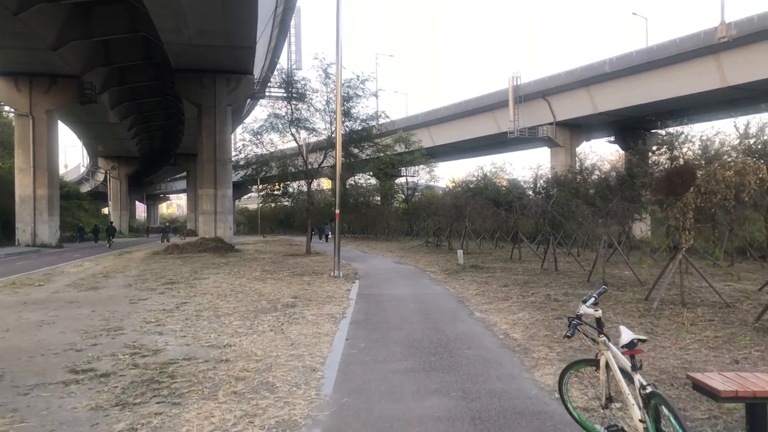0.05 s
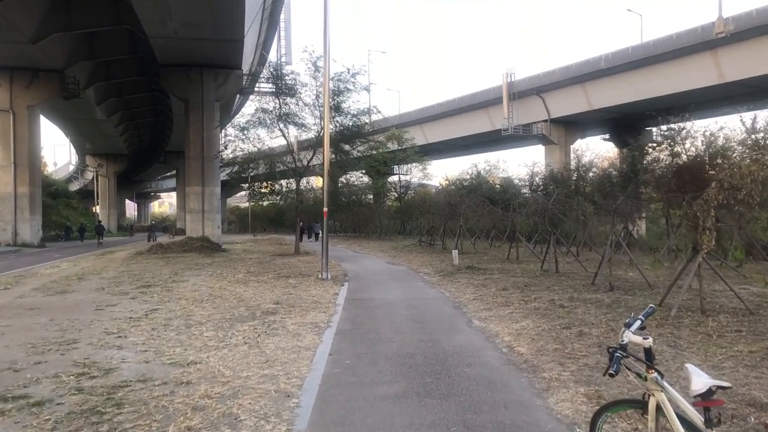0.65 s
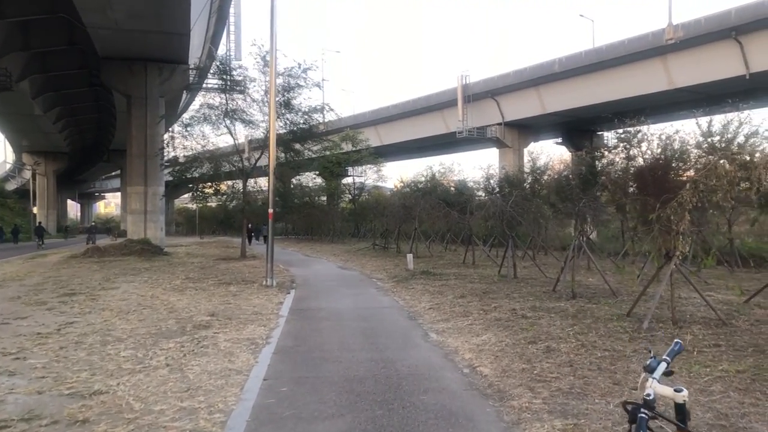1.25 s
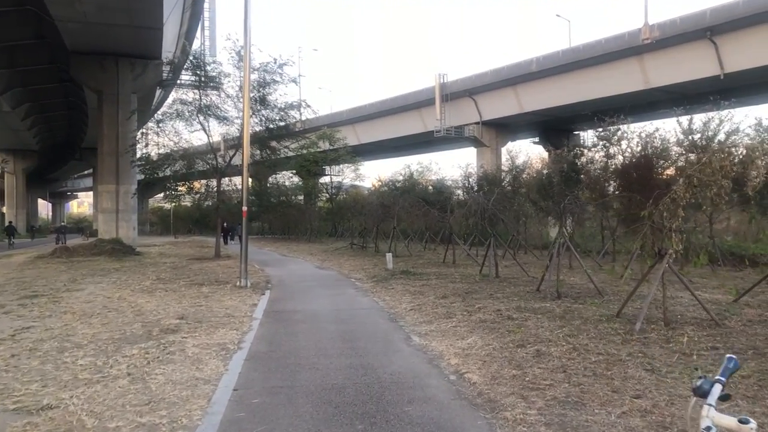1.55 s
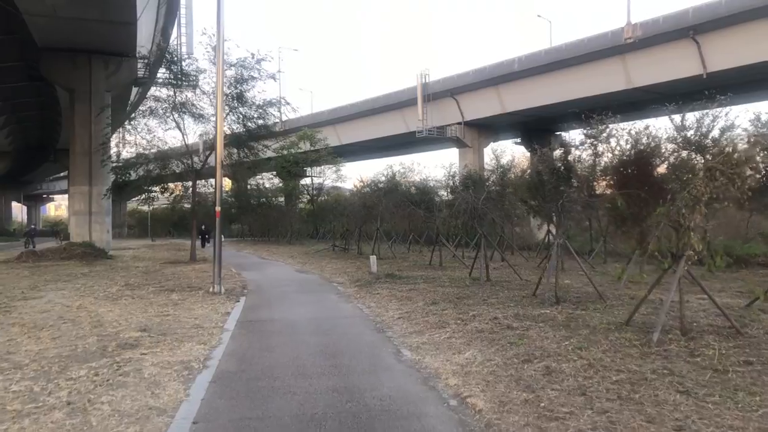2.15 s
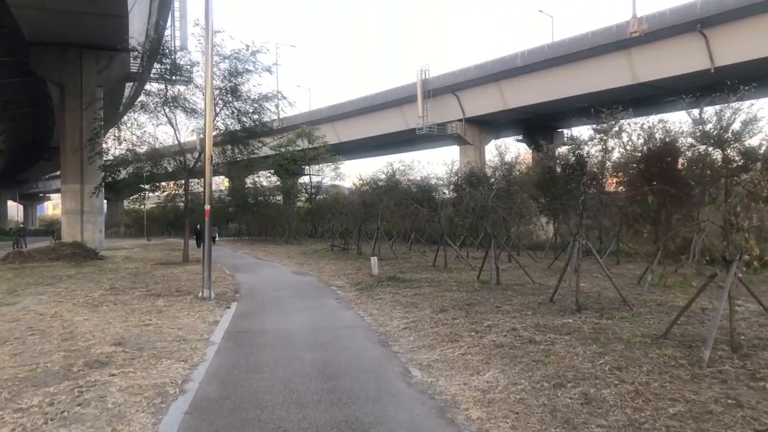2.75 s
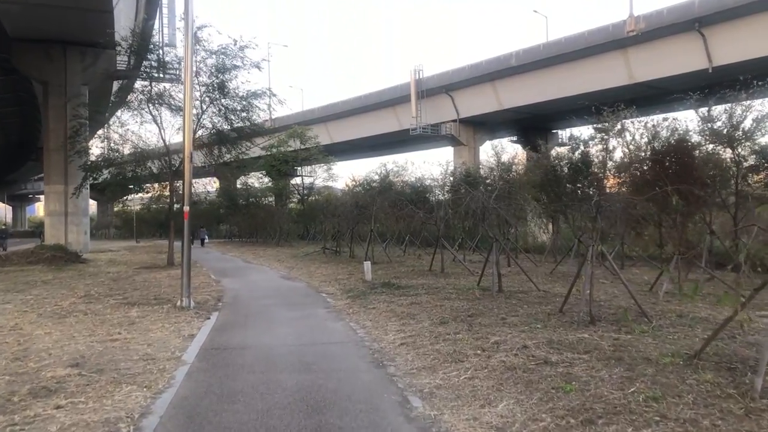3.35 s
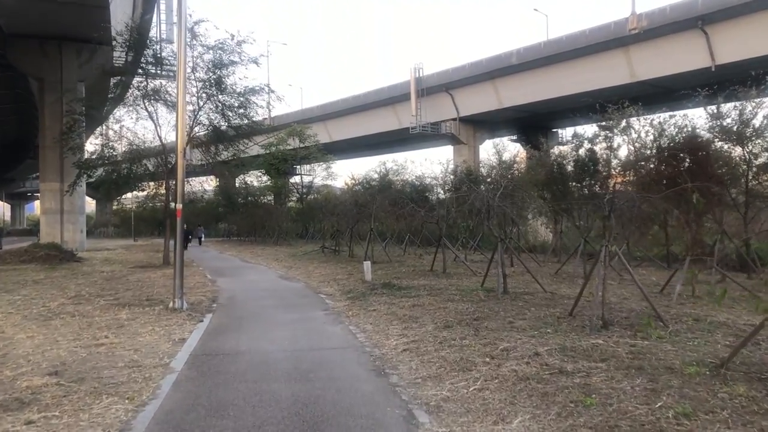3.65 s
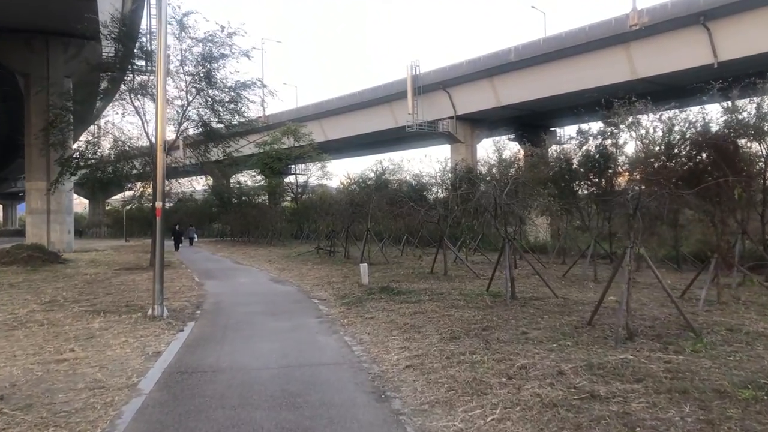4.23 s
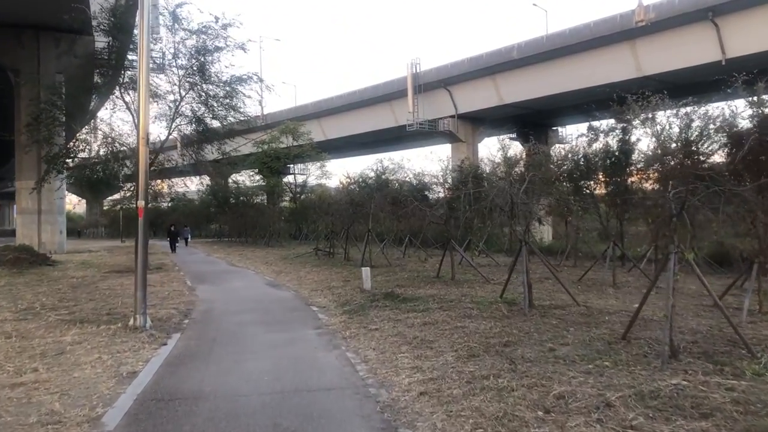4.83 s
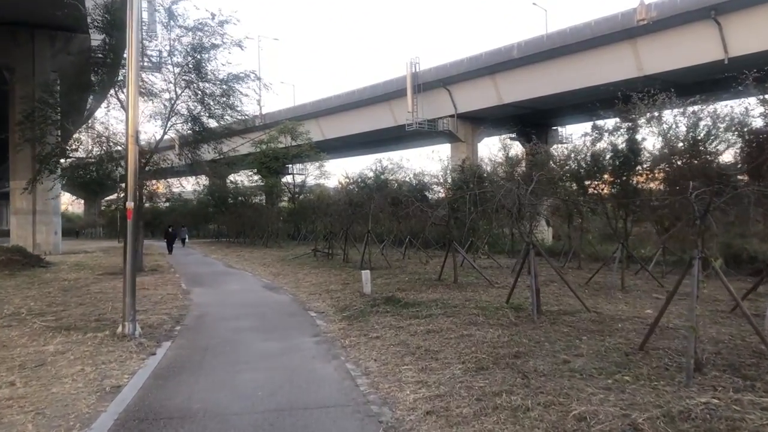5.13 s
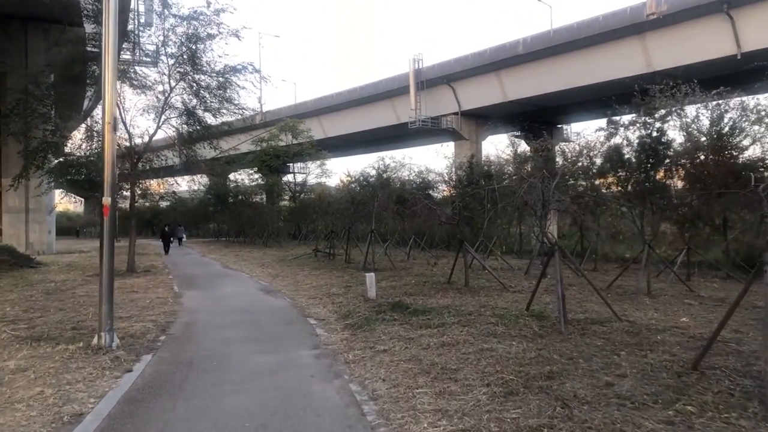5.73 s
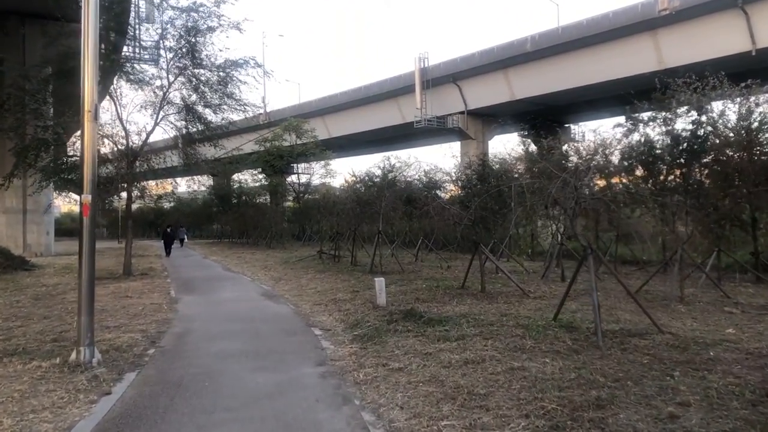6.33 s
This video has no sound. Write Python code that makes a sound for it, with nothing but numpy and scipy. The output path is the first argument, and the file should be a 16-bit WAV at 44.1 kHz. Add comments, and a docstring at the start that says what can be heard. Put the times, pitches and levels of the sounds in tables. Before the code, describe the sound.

Steady traffic roars and rumbles on raised roads overhead, with a booming diesel engine, faint brake squeals and a few bird chirps.

```python
"""Traffic on concrete viaducts, heard from a riverside path below.
From the start tyres roar, wheels shake the decks into a rumble, a diesel drones and a truck's exhaust
swells with each pull. After a second the nearest cars begin to recede and their hiss fades; a small
bird chirps now and then, and a few tiny clicks sound nearby. Just past three seconds the truck is gone
and the diesel passes overhead, booming under the decks; then distant brakes sing faintly three times."""
import sys
import numpy as np
from scipy import signal
from scipy.fft import rfft, irfft, next_fast_len
from scipy.io import wavfile
from scipy.ndimage import uniform_filter1d

SR = 44100
rng = np.random.default_rng(int(sys.argv[2]) if len(sys.argv) > 2 else 0)


def store_pcm(level_fs):
    """Save levels as 16-bit WAV."""
    pcm = np.round(np.clip(level_fs, -1, 1) * 32767).astype(np.int16)
    wavfile.write(sys.argv[1], SR, np.atleast_2d(pcm).T)


N = 290266


def amp(db):
    """Amplitude ratio of a level in decibels."""
    return 10 ** (np.asarray(db) / 20)


def unit_rms(x):
    """Normalisation to an rms of 1."""
    return x / np.sqrt(np.mean(abs(x) ** 2) + 1e-20)


def curves(rows):
    """Linear interpolation of a timed table's columns, sample by sample."""
    times, *columns = np.transpose(rows)
    return [np.interp(np.arange(N) / SR, times, column) for column in columns]


def add(mix, start_s, sound):
    """Superposition of a sound on the mix."""
    part = mix[max(round(start_s * SR), 0):][:len(sound)]
    part += sound[:len(part)]


def swell(start_s, length_s, taper):
    """A raised-cosine envelope from 0 to 1 and back; taper is the share spent rising and falling."""
    progress = (np.arange(N) / SR - start_s) / length_s
    ramp = np.clip(2 * np.minimum(progress, 1 - progress) / taper, 0, 1)
    return np.sin(np.pi / 2 * ramp) ** 2


def wander(rate_hz):
    """Random fluctuation of rms 1: white noise through a Gaussian low-pass."""
    size = next_fast_len(N, True)
    hz = np.fft.rfftfreq(size, 1 / SR)
    lowpass = np.exp(-.5 * (hz / rate_hz) ** 2)
    return unit_rms(irfft(rfft(rng.standard_normal(size)) * lowpass, size)[:N])


def noise(spectrum, patchy_db, size):
    """Spectrally shaped noise of rms 1 whose bands swell and sink in small random patches."""
    hz = np.fft.rfftfreq(size, 1 / SR)
    real, imag, patches = rng.standard_normal((3, 4 * N // size + 5, len(hz)))
    patches = uniform_filter1d(patches, size=14, axis=0)  # over time
    patches = unit_rms(uniform_filter1d(patches, size=10, axis=1))  # over frequency
    knots_hz, knots_db = np.transpose(spectrum)
    shape_db = np.interp(np.log(hz + 1), np.log(knots_hz), knots_db)
    frames = (real + 1j * imag) * amp(shape_db + patchy_db * patches)
    return unit_rms(signal.istft(frames.T, nperseg=size, noverlap=size - size // 4)[1][:N])


def steadied(x, seconds):
    """Division by the running rms evens out the chance swells of a low noise."""
    return x / np.sqrt(uniform_filter1d(x ** 2, max(int(seconds * SR), 1)) + 1e-9)


def multipath(phase, reflected, rate_hz):
    """Interference of a direct tone with shifting reflections makes it flutter; the rms is 1."""
    paths = 1 + reflected * (wander(rate_hz) + 1j * wander(rate_hz))
    return unit_rms((paths * np.exp(1j * phase)).real)


def tyres(closest_s=1.1, approach_db_per_s=0.8, recede_db=-8, recede_s=2.82):
    """Broadband rolling noise: far lanes roar; the nearest cars' hiss fades and dulls with distance."""
    # Each row of these three spectra: frequency in Hz, relative spectral density in dB.
    roar_spectrum = [(150, 0.5), (300, -4.5), (420, -3.5), (600, -1), (820, 1.5), (1100, -3.5), (1500, -8),
                     (2000, -14), (3000, -21), (4500, -36.5), (6500, -55)]
    hiss_spectrum = [(700, -7), (1500, 2.5), (2400, 3.5), (3300, 2.5), (4300, -1.5), (5200, -6),
                     (6000, -11), (7500, -27), (9500, -32)]
    fizz_spectrum = [(3000, -6.5), (5200, 2.5), (6500, 3.5), (7500, 1.5), (9200, -1.5), (9600, -9.5),
                     (9900, -21)]
    # The roar of the far lanes. Each row: time in seconds, level in dB.
    roar_levels = [(0, -40.5), (2.7, -40), (6.58, -41.5)]
    t = np.arange(N) / SR - closest_s
    receded = 1 - np.exp(-(t / recede_s) ** 2)
    near_db = np.where(t < 0, approach_db_per_s * t, recede_db * receded) + 0.1 * wander(rate_hz=1.5)
    roar = amp(curves(roar_levels)[0]) * noise(roar_spectrum, patchy_db=0.84, size=2048)
    hiss = amp(-49.5 + near_db) * noise(hiss_spectrum, patchy_db=0.6, size=1024)
    fizz = amp(-62 + 1.3 * near_db) * noise(fizz_spectrum, patchy_db=1.0, size=512)
    return roar + hiss + fizz


def decks(lumpy_db=2.3, lumpy_hz=3.2):
    """Forced vibration: wheels shake the concrete spans, which radiate a rumble and a hollow body."""
    # Each row of these two spectra: frequency in Hz, relative spectral density in dB.
    rumble_spectrum = [(12, -28.5), (21, -21), (29, -9), (36, 1), (46, 8), (55, -6), (68, 4), (80, -5),
                       (95, -9.5), (140, -21.5), (300, -68.5)]
    body_spectrum = [(50, -21), (90, -5.5), (112, 3.5), (137, 3.5), (162, -5), (195, -2), (240, -7.5),
                     (320, -15), (400, -23.5), (700, -35), (2000, -68)]
    # The load on the decks. Each row: time in seconds, rumble level in dB, body level in dB.
    load = [(0, -32.5, -36.5), (2.1, -34, -37.5), (3.45, -31.5, -34), (4.3, -36, -37), (5.4, -35, -38.6),
            (6.58, -35, -41.5)]
    rumble_db, body_db = curves(load)
    rumble_db += lumpy_db * wander(lumpy_hz)
    rumble = steadied(noise(rumble_spectrum, patchy_db=-0.5, size=8192), seconds=0.15)
    body = steadied(noise(body_spectrum, patchy_db=1.0, size=8192), seconds=0.13)
    return amp(rumble_db) * rumble + amp(body_db) * body


def diesel(overhead_s=3.3, passing_s=0.25):
    """Periodic firing gives a harmonic series; a harmonic booms when it builds up under the decks."""
    # Each row: time in seconds, firing rate in Hz.
    firing = [(0, 37.7), (1.2, 37.13), (2.8, 37.7), (3.15, 37.32), (3.35, 35.62), (3.7, 35.93),
              (4.2, 34.63), (6.58, 35.19)]
    # Each row: harmonic number, level approaching in dB, level leaving in dB, weight of the
    # reflections against the direct sound.
    harmonics = [(2, -39.5, -42, 0.34), (3, -41, -48.5, 0.37), (4, -45.5, -47, .4), (5, -46.5, -48, .4),
                 (6, -50.5, -54, 0.65), (7, -56.5, -58, 2), (8, -55, -54.5, 1.5), (9, -55, -55, 2.6),
                 (10, -64.5, -66.5, 2.4), (11, -59.5, -60.5, 1)]
    # Each row: start in seconds, length in seconds, harmonic number, level in dB.
    build_ups = [(.3, 0.59, 5, -37.5), (0.942, .5, 5, -39), (1.0, 0.41, 2, -38), (1.696, .35, 3, -37),
                 (2.5, .5, 3, -35), (2.6, 0.34, 2, -40.5), (2.848, 0.42, 4, -38.5), (3.262, 0.21, 3, -31),
                 (3.372, 0.57, 2, -30.5), (3.604, 0.65, 3, -25.5), (3.951, 0.45, 6, -40.5),
                 (3.95, .38, 5, -40), (4.12, 0.54, 3, -30.5), (4.68, .4, 4, -41), (4.794, .9, 5, -43.5),
                 (5.255, .5, 4, -41.5), (6.216, .5, 4, -39.5)]
    firing_hz, = curves(firing)
    phase = 2 * np.pi * np.cumsum(firing_hz) / SR
    passed = .5 + .5 * np.tanh((np.arange(N) / SR - overhead_s) / passing_s)
    out = np.zeros(N)
    for k, approach_db, leave_db, reflected in harmonics:
        db = approach_db + (leave_db - approach_db) * passed
        out += amp(db) * multipath(k * phase, reflected, rate_hz=2.7)
    for start, length, k, db in build_ups:
        boom = multipath(k * phase + np.pi / 2, reflected=0.1, rate_hz=7)
        out += amp(db) * swell(start, length, taper=0.5) * boom
    return out


def truck(exhaust_hz=52.8, sag_hz_per_s=0.95, coast_db=-35, ramp_s=0.22, gone_s=3.22):
    """Amplitude modulation: a deep, slowly sagging exhaust note swells with each pull on the throttle."""
    # Each row: start in seconds, length in seconds, level in dB.
    throttle = [(-.1, 0.6, -30.5), (0.247, 1.15, -26.5), (2.454, 0.6, -27), (2.923, 0.28, -26)]
    t = np.arange(N) / SR
    coasting = amp(coast_db) * np.clip((gone_s - t) / ramp_s, 0, 1)
    pulls = [amp(db) * swell(start, length, 2 * ramp_s / length) for start, length, db in throttle]
    phase = 2 * np.pi * np.cumsum(exhaust_hz - sag_hz_per_s * t) / SR
    return np.max([coasting] + pulls, axis=0) * multipath(phase, reflected=0.056, rate_hz=4)


def tyre_rushes(width_hz=230):
    """Narrow-band noise, a carrier times a random fluctuation, rises out of the hiss and sinks back."""
    # Each row: start in seconds, length in seconds, centre frequency in Hz, level in dB.
    rushes = [(.85, 0.65, 5470, -65), (1.2, 1.5, 4920, -67.5)]
    out, t = np.zeros(N), np.arange(N) / SR
    for start, length, hz, db in rushes:
        band = unit_rms(wander(width_hz) * np.cos(2 * np.pi * hz * t))
        out += amp(db) * swell(start, length, taper=0.46) * band
    return out


def bird(arch=0.053, rasp=0.01):
    """Frequency modulation: short whistles arch over a rounded top, roughened by pitch jitter."""
    # Each row: start in seconds, length in seconds, top pitch in Hz, level in dB.
    chirps = [(1.272, .055, 5270, -54.5), (3.211, 0.07, 5350, -63), (5.708, .062, 5360, -65.5),
              (5.766, .045, 5376, -68.5), (5.964, 0.035, 5470, -72)]
    out = np.zeros(N)
    for start, length, top_hz, db in chirps:
        progress = np.linspace(0, 1, int(length * SR))
        jitter = rasp * wander(rate_hz=180)[:len(progress)]
        hz = top_hz * (1 - arch * (1 - progress / .6) ** 2 + jitter)
        whistle = np.sin(np.pi * progress) * np.sin(2 * np.pi * np.cumsum(hz) / SR)
        add(out, start, amp(db) * unit_rms(whistle))
    return out


def viaduct(x, t60_s=0.97, tail_db=-6.5, echo_s=0.093, echo_db=-11.0):
    """Reflection adds one echo from the piers and diffuse reverberation from beneath the decks."""
    t = np.arange(SR) / SR
    response = rng.standard_normal(SR) * amp(-60 * t / t60_s)
    response *= amp(tail_db) / np.linalg.norm(response)
    add(response, echo_s, amp([echo_db]))
    return x + signal.fftconvolve(x, response)[:N]


def clicks():
    """Gaussian pulses of a cycle or two, so brief that their spectrum is broad: dry snaps close by."""
    # Each row: start in seconds, peak level in dB, centre frequency in Hz, width in seconds.
    snaps = [(1.804, -29.3, 3230, 0.00033), (2.604, -25, 5460, 0.00011), (5.5731, -38, 4833, 0.00028),
             (5.575, -31, 2662, 0.00042), (6.159, -31, 3100, 0.00032)]
    out, t = np.zeros(N), np.arange(256) / SR
    for start, db, hz, width in snaps:
        envelope = np.exp(-2 * (t / width - 2) ** 2)
        add(out, start, amp(db) * envelope * np.cos(2 * np.pi * hz * (t - 2 * width)))
    return out


def brakes(waver_hz=4, burst_db=2.0):
    """Far brake discs vibrate in thin overtones, which flutter by multipath interference."""
    # Each row: start in seconds, length in seconds, fundamental in Hz, levels of harmonics 2-4 in dB.
    squeals = [(3.4, 0.82, 1069, -56.5, -70, -70.5), (4.55, 0.58, 1055, -60.5, -64, -67.5),
               (5.88, 0.62, 1077, -64, -67, -81)]
    out = np.zeros(N)
    for start, length, hz, *levels_db in squeals:
        phase = 2 * np.pi * np.cumsum(hz + waver_hz * wander(rate_hz=7.5)) / SR
        for k, db in enumerate(levels_db, 2):
            bursts = amp(burst_db * wander(rate_hz=11))
            tone = (bursts * multipath(k * phase, reflected=2.2, rate_hz=27))[:int(length * SR)]
            add(out, start, amp(db) * unit_rms(tone) * signal.windows.tukey(len(tone), .4))
    return out


def scene():
    """Superposition of all sources at the path, in mono."""
    traffic = tyres() + tyre_rushes() + decks() + diesel() + truck() + brakes()
    return (traffic + viaduct(bird()) + clicks())[None]


def record(dry, edge_hz=9700):
    """Band limiting: a steep low-pass filter removes the highest treble."""
    lowpass = signal.firwin(511, edge_hz, window=("kaiser", 9), fs=SR)
    return signal.oaconvolve(dry, lowpass[None], "same")


dry = scene()
out = record(dry)
store_pcm(out)
```